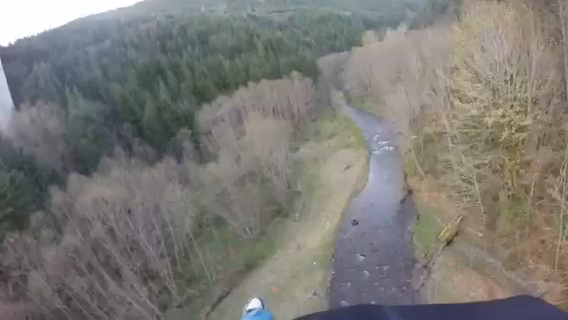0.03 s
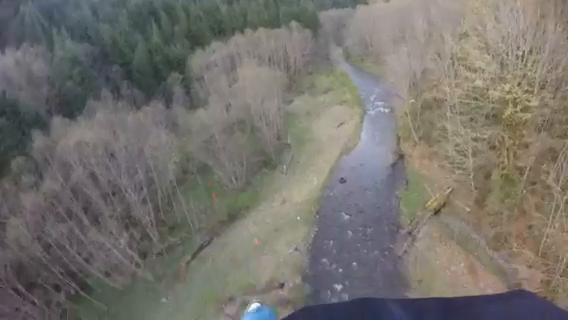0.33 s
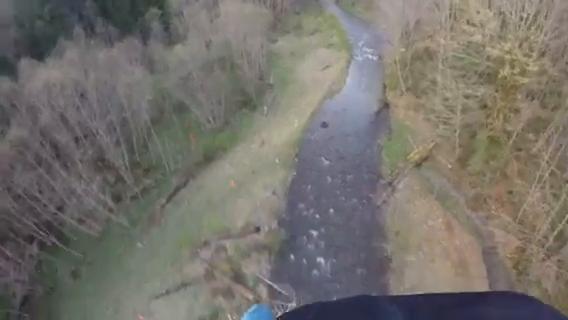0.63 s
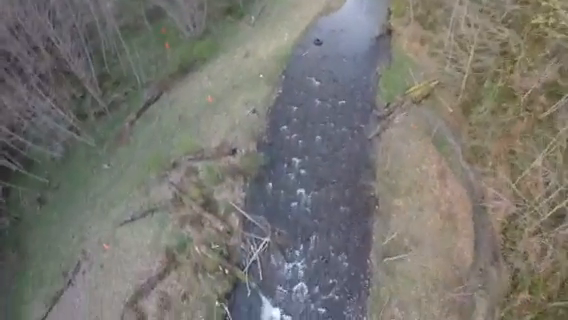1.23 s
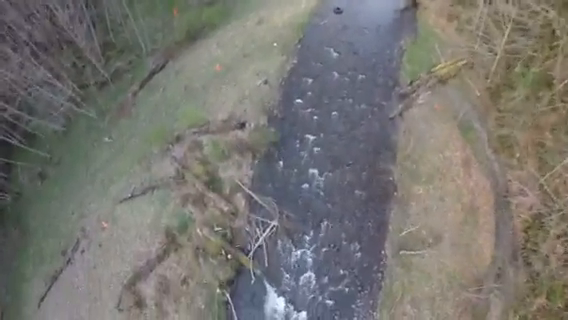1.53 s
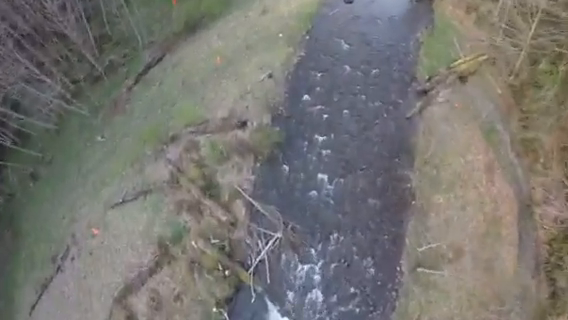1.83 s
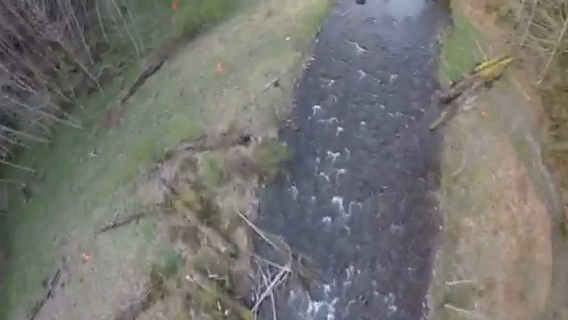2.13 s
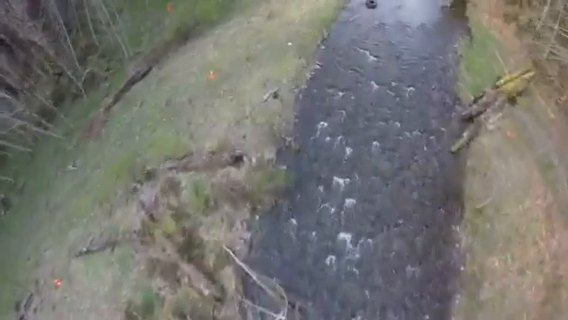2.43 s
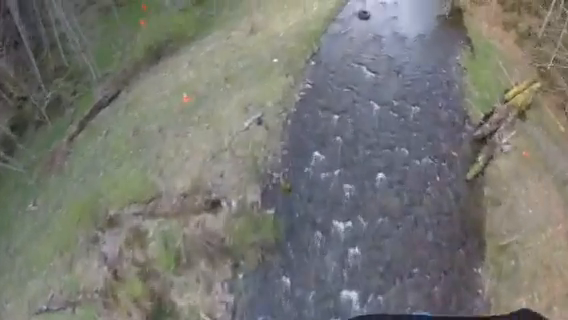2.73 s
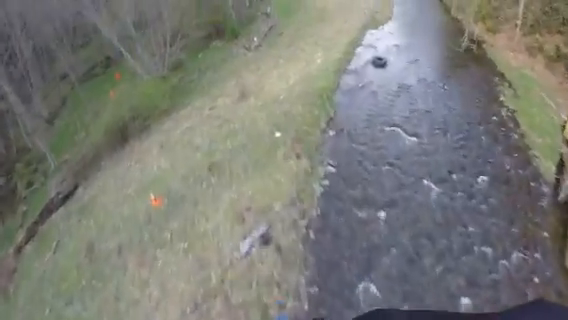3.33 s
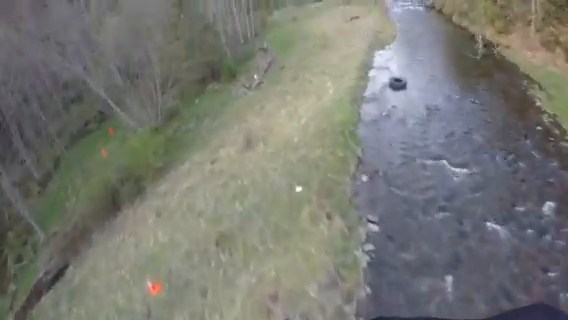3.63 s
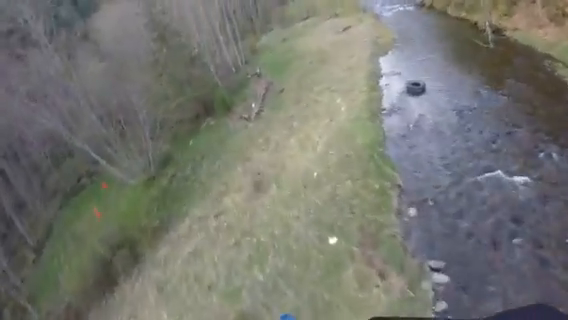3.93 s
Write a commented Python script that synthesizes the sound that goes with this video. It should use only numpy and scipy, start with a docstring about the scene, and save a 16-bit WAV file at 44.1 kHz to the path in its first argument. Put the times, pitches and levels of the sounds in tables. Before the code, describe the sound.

Steady buffeting wind on a fast-moving camera, with gritty scuffs and a few faint ticks.

```python
"""A camera in a plastic housing is carried fast through the air above a river.
A short hiss opens the scene, while turbulent wind rumbles on the housing and rushes past throughout.
Gear soon scuffs the housing in gritty strokes whose friction rings its modes, and gives one tiny squeak.
From one second on, single eddies buffet the housing; a thin, high wisp of air passes midway.
A run of tiny ticks comes late, and the rush ends with a hollow colour."""
import sys
import numpy as np
from scipy import signal
from scipy.fft import rfft, irfft
from scipy.io import wavfile
from scipy.ndimage import uniform_filter1d

SR = 44100
rng = np.random.default_rng(int(sys.argv[2]) if len(sys.argv) > 2 else 0)


def file_out(sig):
    """Save sig as 16-bit WAV at sys.argv[1]."""
    # one column per channel
    cols = np.atleast_2d(sig).T
    # limit, then scale
    lim = np.clip(cols, -1, 1)
    pcm = np.round(lim * 32767).astype(np.int16)
    wavfile.write(sys.argv[1], SR, pcm)


N = 176400
T = np.arange(N) / SR


def from_db(db):
    """Amplitude grows tenfold for every 20 dB."""
    return 10 ** (np.asarray(db) / 20)


def rms_one(x):
    """Normalisation to unit rms."""
    return x / np.sqrt(np.mean(x ** 2) + 1e-20)


def curve(rows):
    """Linear interpolation in time between (seconds, value) rows."""
    return np.interp(T, *np.transpose(rows))


def swell(peak_s, rise_s, fall_s):
    """A Gaussian envelope with separate widths for its rise and fall."""
    first, last = np.searchsorted(T, [peak_s - 4 * rise_s, peak_s + 4 * fall_s])
    envelope, t = np.zeros(N), T[first:last] - peak_s
    envelope[first:last] = np.exp(-(t / np.where(t < 0, rise_s, fall_s)) ** 2)
    return envelope


def flutter(spread_db, rate_hz):
    """Random amplitude modulation: a gain that follows noise low-passed at the given rate."""
    step, settle = 40, 2000
    pole = np.exp(-2 * np.pi * rate_hz * step / SR)
    noise = rng.standard_normal(N // step + settle + 2)
    slow = signal.lfilter([1], [1, -2 * pole, pole * pole], noise)[settle:]
    return from_db(spread_db * np.interp(np.arange(N) / step, np.arange(len(slow)), rms_one(slow)))


def coloured(colour):
    """Spectral shaping of white noise by (Hz, dB) rows, rolled off above the last row; rms 1."""
    hz, db = np.transpose(colour)
    f = np.maximum(np.arange(N // 2 + 1) * SR / N, 1)
    gain = from_db(np.interp(np.log(f), np.log(hz), db))
    roll_off = f ** 2 / (f ** 2 + 10 ** 2) / np.maximum(f / hz[-1], 1) ** 2
    return rms_one(irfft(rfft(rng.standard_normal(N)) * gain * roll_off, N))


def band_noise(low_hz, high_hz, order=2, size=N):
    """White noise limited by a Butterworth band-pass; rms 1."""
    band = signal.butter(order, [low_hz, high_hz], "band", fs=SR, output="sos")
    return rms_one(signal.sosfilt(band, rng.standard_normal(size)))


def burst(peak_s, half_s, db, low_hz, high_hz, size=32768):
    """Band noise under a Gaussian window, with its level set at the middle."""
    t = (np.arange(size) - size // 2) / SR
    window = np.exp(-np.minimum((t / half_s) ** 2, 50))
    puff = band_noise(low_hz, high_hz, order=4, size=size) * window
    out, start = np.zeros(N + size), int(peak_s * SR)
    out[start:start + size] = from_db(db) * puff * np.sqrt(np.sum(window ** 2) / np.sum(puff ** 2))
    return out[size // 2:size // 2 + N]


def hiss():
    """Noise with a spectral peak near 3.4 kHz swells and fades as a bright hiss."""
    # Each row: frequency in Hz, relative spectral level in dB.
    colour = [(1000, -17.5), (1600, -10), (2650, -11), (3050, 0.5), (3450, 2.5), (3750, -5.5), (3950, -5),
              (4250, -14), (4550, -10), (4950, -17), (6600, -21), (7800, -12.5), (8400, -20.5), (9100, -34),
              (10100, -29), (12800, -33), (15500, -43)]
    return from_db(-43) * swell(peak_s=.11, rise_s=.096, fall_s=.28) * coloured(colour)


def rumble():
    """Turbulent pressure on the housing reaches higher frequencies as the flow quickens."""
    # Each row: time in seconds, level in dB.
    deep_level = [(0, -43.5), (.7, -47.5), (1.2, -40), (1.5, -44), (1.9, -43), (2.3, -41.5), (2.75, -44),
                  (3.1, -38.5), (3.5, -40.5), (4, -39.5)]
    fast_flow_level = [(0, -54.5), (2, -58.5), (2.6, -53), (3.05, -48), (3.45, -45), (3.7, -50), (4, -49)]
    # Each row: frequency in Hz, relative spectral level in dB.
    deep_colour = [(12, 10.5), (25, 5.5), (45, -3), (110, -9.5), (200, -16.5), (320, -30), (600, -31.5),
                   (1500, -55.5)]
    fast_flow_colour = [(40, -34), (90, 6.5), (130, 9.5), (200, -0.5), (400, -8), (1000, -53)]
    deep = from_db(curve(deep_level)) * coloured(deep_colour)
    fast_flow = from_db(curve(fast_flow_level)) * coloured(fast_flow_colour)
    return (deep + fast_flow) * flutter(spread_db=1, rate_hz=22)


def rush():
    """Flow noise is filtered by the housing; a band near 1.8 kHz turns it hollow at the end."""
    # Each row: frequency in Hz, relative spectral level in dB.
    colour = [(150, -5.5), (350, -1.5), (570, -7), (880, -1.5), (1250, -5.5), (1620, 1), (2080, -6.5),
              (2390, 5.5), (2690, -8.5), (3000, 0.5), (3130, -3), (3320, 2.5), (3800, -10), (4250, -14),
              (4680, -8), (5050, -18), (6300, -14.5), (7100, -25.5), (7900, -23), (9200, -32.5),
              (10100, -28.8), (10900, -36), (12500, -35.5), (14800, -44), (15600, -54)]
    # Each row: time in seconds, gain in dB (of the whole rush, then of its treble against the rest).
    overall_gain = [(0, -52.5), (.5, -47.5), (.72, -51.5), (.95, -50), (1.1, -50), (1.35, -44.5),
                    (1.58, -49), (1.95, -49), (2.25, -45.5), (2.6, -46.5), (2.85, -46.5), (3.2, -45.5),
                    (3.6, -48.5), (4, -48.5)]
    treble_gain = [(0, -3), (.6, -3), (.9, 4), (1.4, 3), (1.8, 4.5), (2.3, 1), (2.9, 1), (3.4, 0), (4, 0.5)]
    air = coloured(colour)
    treble = signal.sosfiltfilt(signal.butter(2, 3600, "high", fs=SR, output="sos"), air)
    air = from_db(curve(overall_gain)) * (air + (from_db(curve(treble_gain)) - 1) * treble)
    hollow = from_db(-50.5) * swell(peak_s=3.72, rise_s=.41, fall_s=.59) * band_noise(1550, 1990)
    return (air + hollow) * flutter(spread_db=.98, rate_hz=50)


def housing(force, modes):
    """Modal superposition: damped resonances respond in parallel, with alternating signs."""
    out = 0
    for k, (hz, width_hz, db) in enumerate(modes):
        r = np.exp(-np.pi * width_hz / SR)
        response = signal.lfilter([1, 0, -1], [1, -2 * r * np.cos(2 * np.pi * hz / SR), r * r], force)
        out = out + (-1) ** k * from_db(db) * (1 - r * r) / 2 * response
    return out


def friction(modes, slips_per_s=1800, slip_spread_db=3.5, soft_contact_hz=5130, steady_s=.032):
    """Stick-slip friction: dense juddering slips over a smooth rub drive the modes; rms held near 1."""
    sizes = from_db(slip_spread_db * np.minimum(rng.exponential(1, N), 4)) * rng.choice([-1, 1], N)
    slips = rms_one(sizes * (rng.random(N) < slips_per_s / SR))
    smooth_rub = .52 * rng.standard_normal(N)
    force = signal.sosfilt(signal.butter(2, soft_contact_hz, fs=SR, output="sos"), slips + smooth_rub)
    rub = housing(force * flutter(spread_db=2.5, rate_hz=32), modes)
    return rub / np.sqrt(uniform_filter1d(rub ** 2, int(steady_s * SR)) + 1e-12)


def scuffs(catch_rise_s=.0005, catch_fall_s=.0034):
    """Strokes and sharp catches of gear add in power; harder contacts favour the ringing modes."""
    # Each row: peak time, rise and fall in seconds, level in dB, strength of the ringing modes in dB.
    strokes = [(.205, 0.019, 0.015, -39.5, -15), (0.264, 0.028, 0.026, -38, -4),
               (0.423, 0.0068, 0.023, -46.5, -18), (.575, 0.017, 0.027, -43, -8),
               (0.656, 0.028, 0.019, -40, -35), (.715, 0.028, 0.026, -43.5, -25),
               (.776, 0.019, 0.021, -42, 9), (.82, 0.081, 0.09, -44.5, -3.5), (.881, 0.017, 0.013, -29, 8),
               (.935, 0.012, 0.034, -44, 1), (1.26, 0.1, 0.036, -46, 3), (1.33, 0.018, 0.025, -39.5, -0.5),
               (1.444, 0.035, 0.039, -34.5, 2.5), (1.48, 0.033, 0.06, -42, -0.5),
               (1.754, 0.029, 0.087, -37, -0.5), (2.145, 0.03, 0.031, -39, -1.5),
               (2.21, .02, .025, -37, -3), (2.27, 0.024, 0.015, -38.5, 1), (2.33, 0.041, 0.077, -39.5, 3.5),
               (2.47, 0.033, 0.061, -43.5, 4), (2.711, 0.024, 0.024, -44.5, -1.5),
               (2.785, 0.0088, 0.013, -43.5, 11), (3.035, .035, 0.011, -35.5, 3),
               (3.095, 0.022, 0.017, -41.5, 1), (3.165, 0.02, 0.018, -34, 0),
               (3.193, 0.016, 0.018, -31.5, 1), (3.24, 0.041, 0.028, -39.5, 5),
               (3.354, 0.014, 0.027, -33.5, 0.5), (3.38, 0.011, 0.028, -34.5, 4),
               (3.445, 0.036, 0.018, -40.5, 0), (3.515, 0.026, 0.011, -34, 6.5),
               (3.55, 0.016, 0.01, -40, -3.5)]
    # Each row: peak time in seconds, level in dB, strength of the ringing modes in dB.
    catches = [(.423, -40, -17), (.571, -43, -10), (.773, -28.5, 9), (.823, -43, 12), (0.865, -38, 3),
               (0.93, -33.5, 8), (1.008, -31.5, 4), (1.031, -32, 7), (1.621, -38.5, 7), (1.654, -37.5, -14),
               (1.738, -35, -9), (2.208, -34.5, 0), (2.579, -38, 7), (2.608, -37, 11), (2.858, -46.5, -18),
               (3.005, -39, 7), (3.162, -34, 9), (3.183, -35, -1), (3.337, -27.5, 6), (3.744, -39.5, -3)]
    # Each row: mode frequency in Hz, bandwidth in Hz, relative gain in dB.
    body_modes = [(430, 670, -14.5), (874, 91, -1.5), (1070, 88, -3), (1549, 153, 4.5), (1666, 400, -1),
                  (2400, 280, -2.5), (3420, 410, -17), (4480, 140, -18)]
    ring_modes = [(2280, 190, 4.5), (2416, 84, 12), (2998, 68, 5), (3578, 84, -4), (4050, 170, -22),
                  (4540, 91, -13), (5180, 130, -18.5), (6170, 310, -14)]
    contacts = strokes + [(s, catch_rise_s, catch_fall_s, db, ring_db) for s, db, ring_db in catches]
    body_power, ring_power = np.zeros(N), np.zeros(N)
    for peak_s, rise_s, fall_s, db, ring_db in contacts:
        power = (from_db(db) * swell(peak_s, rise_s, fall_s)) ** 2
        ring_share = 1 / (1 + from_db(-ring_db) ** 2 / 2)
        body_power += power * (1 - ring_share)
        ring_power += power * ring_share
    return np.sqrt(body_power) * friction(body_modes) + np.sqrt(ring_power) * friction(ring_modes)


def tap(modes, decay_s, size=600):
    """Impact excitation: decaying noise rings the modes, with the energy of rms 1 for two decay times."""
    force = rng.standard_normal(size) * np.exp(-np.arange(size) / SR / decay_s)
    ring = housing(force, modes)
    return ring * np.sqrt(2 * decay_s * SR / np.sum(ring ** 2))


def ticks(decay_s=.00074):
    """Very brief contacts excite the housing's treble modes as tiny dry ticks."""
    # Each row: time in seconds, level of the high modes in dB, low modes relative to them in dB.
    impacts = [(0.282, -64, 17), (0.422, -60.5, 10), (2.7071, -47.5, 8), (2.9167, -49, 4), (2.9831, -50, 6),
               (3.054, -49.5, 3), (3.0985, -51.5, 7.5), (3.2235, -48.5, 6), (3.293, -47.5, 0.5),
               (3.339, -51.5, 13.5), (3.4451, -48.5, 7.5)]
    # Each row: mode frequency in Hz, bandwidth in Hz, relative gain in dB.
    high_modes = [(9940, 670, 3), (12000, 860, -2), (14500, 3900, -13)]
    low_modes = [(4370, 310, 6), (6000, 480, 9), (8400, 800, -20)]
    out = np.zeros(N)
    for time_s, db, low_db in impacts:
        tick = from_db(db) * (tap(high_modes, decay_s) + from_db(low_db) * tap(low_modes, decay_s))
        start = int((time_s - decay_s) * SR)
        out[start:start + len(tick)] += tick
    return out


def squeak():
    """The gear squeaks once: a narrow-band transient of a few milliseconds."""
    return burst(peak_s=.63, half_s=.0016, db=-52.5, low_hz=6900, high_hz=8100)


def buffets():
    """Each eddy that strikes the housing gives a low-frequency pressure pulse."""
    # Each row: peak time in seconds, half length in seconds, level in dB, nominal frequency in Hz.
    eddies = [(1.031, 0.014, -36, 83), (1.053, 0.023, -32, 34.3), (1.131, 0.011, -35, 110),
              (1.393, 0.0049, -42, 230), (1.411, 0.034, -45, 39), (1.541, .007, -40.5, 270),
              (1.60, 0.011, -29, 64), (1.655, 0.025, -38.5, 83), (2.14, 0.014, -41.5, 135),
              (2.412, 0.043, -29, 18.6), (2.718, 0.033, -35.5, 42), (3.031, 0.014, -35.5, 67)]
    return sum(burst(peak_s, half_s, db, hz / 2, hz * np.sqrt(2)) for peak_s, half_s, db, hz in eddies)


def wisp():
    """Flow noise confined to a high band is heard as a thin wisp of air."""
    return burst(peak_s=2.08, half_s=.06, db=-72, low_hz=9800, high_hz=13100)


def scene():
    """Superposition: the pressures of all sources add at one microphone."""
    return (rumble() + buffets() + rush() + scuffs() + hiss() + wisp() + ticks() + squeak())[None]


def record(dry, cutoff_hz=15400):
    """The microphone's self-noise adds a faint hiss, and a steep low-pass limits the bandwidth."""
    self_noise = from_db(-78) * band_noise(6030, 13000, order=3)
    return signal.sosfilt(signal.ellip(10, .2, 70, cutoff_hz, fs=SR, output="sos"), dry + self_noise)


dry = scene()
out = record(dry)
file_out(out)
```